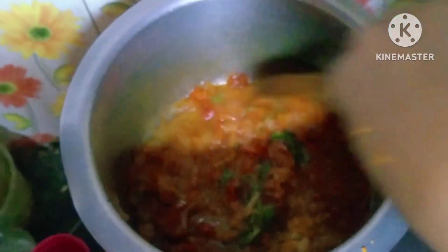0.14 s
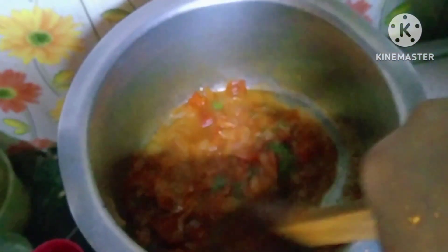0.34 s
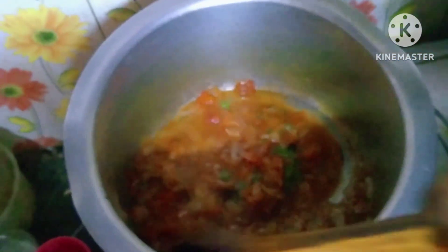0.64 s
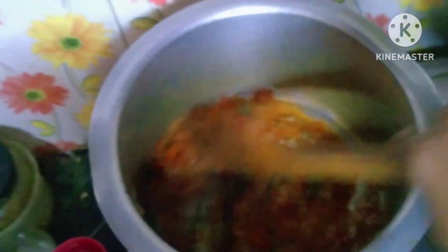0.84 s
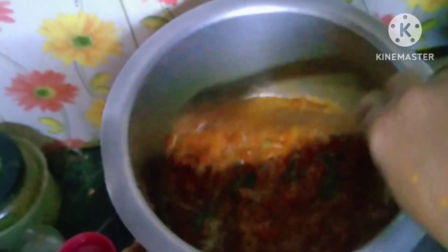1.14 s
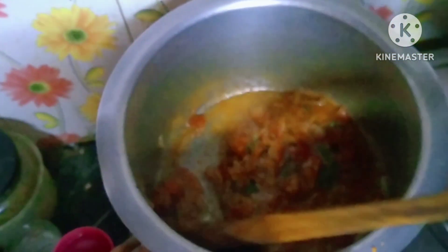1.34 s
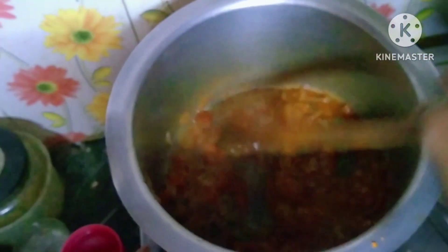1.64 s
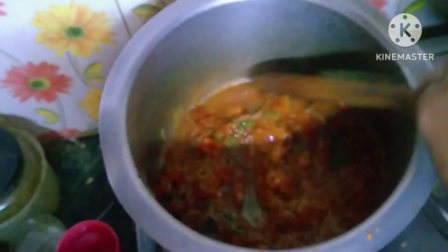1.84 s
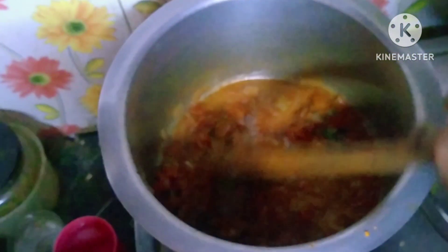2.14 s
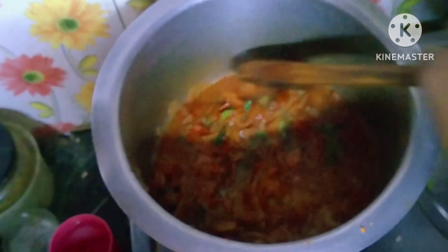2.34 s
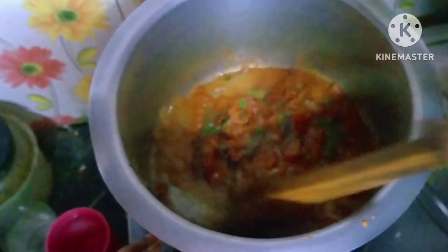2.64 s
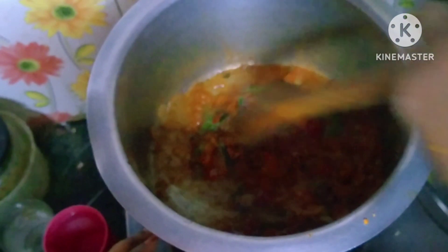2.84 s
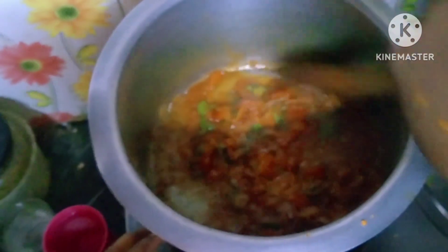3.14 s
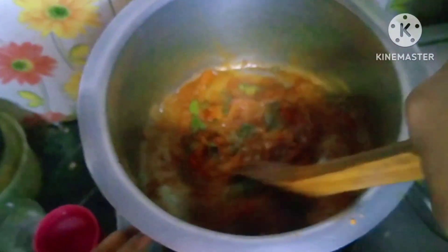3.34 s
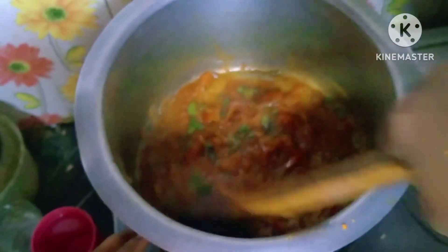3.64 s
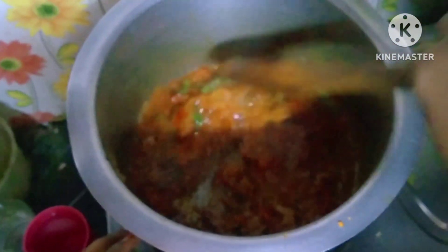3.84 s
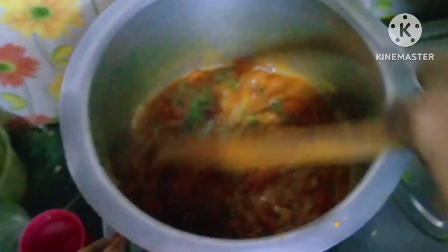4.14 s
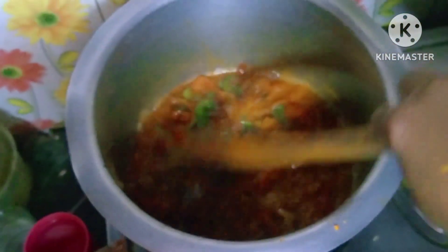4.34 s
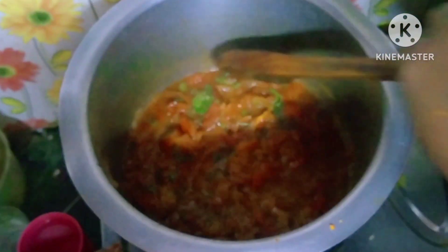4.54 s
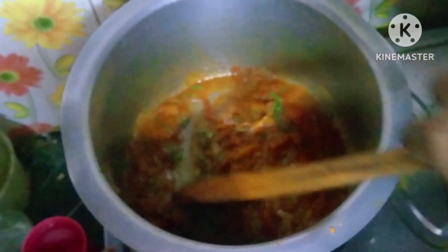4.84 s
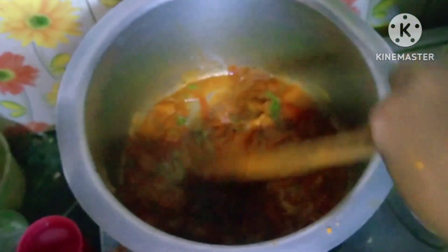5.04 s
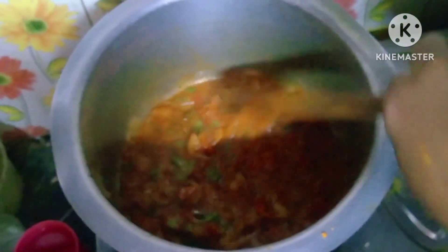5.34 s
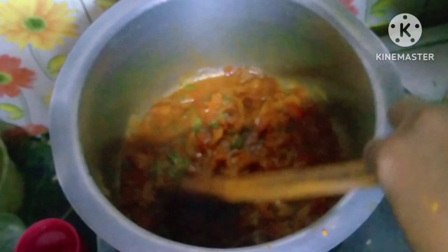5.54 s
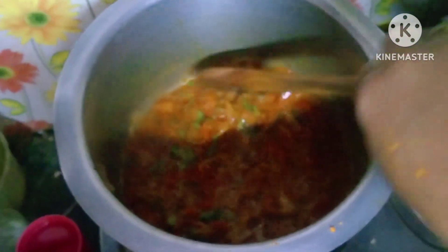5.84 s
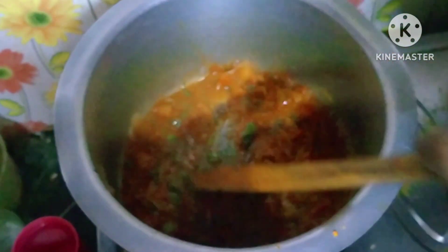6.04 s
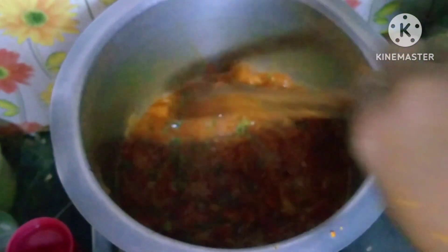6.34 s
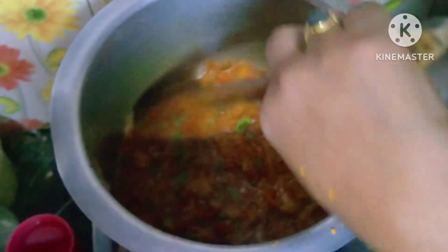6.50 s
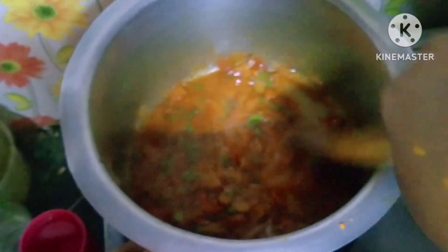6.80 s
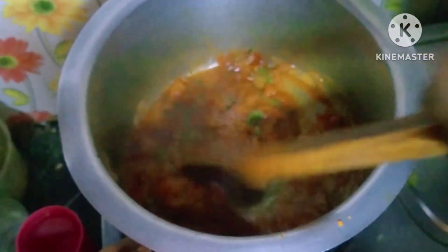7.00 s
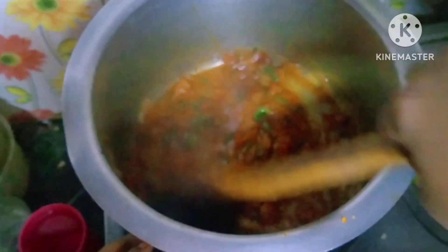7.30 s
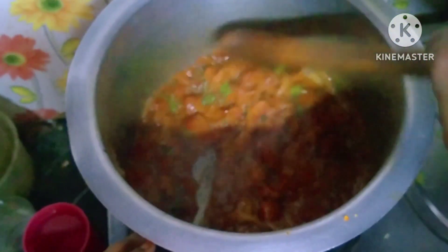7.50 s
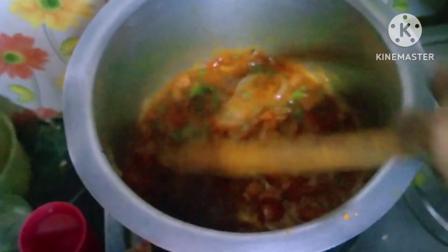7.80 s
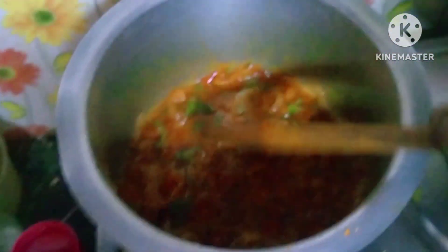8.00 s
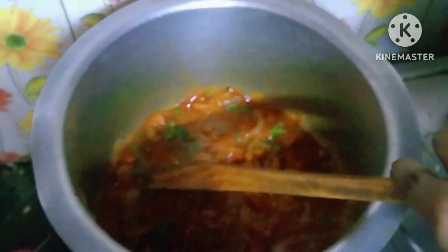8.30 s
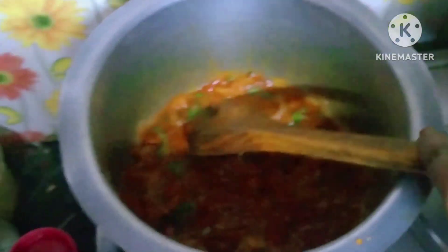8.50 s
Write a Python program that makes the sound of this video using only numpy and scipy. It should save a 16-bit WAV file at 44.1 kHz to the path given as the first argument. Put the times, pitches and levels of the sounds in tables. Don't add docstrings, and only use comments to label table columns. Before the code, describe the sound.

Close by in a small tiled kitchen, thick sauce fries throughout with a fine, uneven crackling hiss and little spits of steam. At 0.1 s a wooden spoon strikes the thin metal pot: a bright woody clack with a clear, short ring. Quick wet scrapes follow, with a dull thud and smack at 0.8 s and another ringing clank at 1.15 s. The pot rattles on its iron grate near 2 s; a firm clank comes at 2.55 s, with a lighter touch just after. Softer knocks fall at 3.2 and 3.7 s. From 4.4 to 6 s it is mostly stirring, grate rattle, low thumps and stove shudder, with small spits. At 7.35 s comes a hard clank with a strong wet smack, thud and rattle, then a lesser ringing knock at 7.7 s. The scraping settles and the sizzle continues slightly softer to about 8.7 s.

```python
import sys
import numpy as np
from scipy import signal
from scipy.fft import rfft, irfft, next_fast_len
from scipy.io import wavfile

SR = 44100
rng = np.random.default_rng(int(sys.argv[2]) if len(sys.argv) > 2 else 0)


def unload_wav(signal):
    wavfile.write(
        sys.argv[1],
        SR,
        np.round(np.clip(np.atleast_2d(signal).T, -1, 1) * 32767).astype(np.int16),
    )


def natural_amplitude(level_db):
    exponent = np.asarray(level_db, float) / 20
    return 10 ** exponent


N = 381906


def unit(x):
    return x / np.sqrt(np.mean(x ** 2))


def noise():
    return rng.standard_normal(N)


def decay(t, t60):
    return np.exp(-np.log(1000) * t / t60)


def colour(x, spectrum):
    hz, db = np.transpose(spectrum)
    size = next_fast_len(N)
    log_hz = np.log(np.arange(size // 2 + 1) * SR / size + 1)
    gain = natural_amplitude(np.interp(log_hz, np.log(hz), db))
    return unit(irfft(rfft(x, size) * gain, size)[:N])


def split(x, hz):
    parts = []
    for kind in ("low", "high"):
        sos = signal.butter(4, hz, kind, fs=SR, output="sos")
        parts.append(unit(signal.sosfilt(sos, x)))
    return parts


def ring(x, hz, t60):
    r, w = decay(1 / SR, t60), 2 * np.pi * hz / SR
    return signal.lfilter([0, r * np.sin(w)], [1, -2 * r * np.cos(w), r * r], x)


def swell(x, hz, t60, rise_s):
    return 2 / (rise_s * SR) * ring(ring(x, hz, t60), hz, rise_s * np.log(1000))


def resonate(x, peaks):
    return unit(sum(natural_amplitude(db) * unit(ring(x, hz, np.log(1000) / (np.pi * width))) for hz, width, db in peaks))


def grains(share, spread_db):
    clicks = (rng.random(N) < share) * noise()
    return unit(clicks * natural_amplitude(spread_db * np.minimum(rng.exponential(size=N), 4)))


def fizz(rate, t60, spread_db):
    starts = rng.random(N) < rate / SR
    bubbles = starts * natural_amplitude(spread_db * np.minimum(rng.exponential(size=N), 3))
    return unit(signal.lfilter([1], [1, -decay(1 / SR, t60)], bubbles))


def puffs(times, dbs, t60s, rise_s):
    out, t = np.zeros(N), np.arange(SR // 2) / SR
    for s, db, t60 in zip(times, dbs, t60s):
        i = int(s * SR)
        shape = (1 - np.exp(-t / rise_s)) * decay(t, max(t60, .005))
        out[i:i + len(t)] += natural_amplitude(db) * shape[:N - i]
    return out


def surges(times, dbs, rises, t60s):
    t = np.arange(0, N, 64) / SR
    power = 0
    for s, db, rise, t60 in zip(times, dbs, rises, t60s):
        slope_db = np.where(t < s, 20 * (t - s) / max(rise, .005), -60 * (t - s) / t60)
        power = power + natural_amplitude(db + slope_db) ** 2
    return np.interp(np.arange(N) / SR, t, np.sqrt(power))


def blows(times, dbs, skid, skid_s):
    hits = np.zeros(N)
    hits[(np.asarray(times) * SR).astype(int)] = natural_amplitude(dbs)
    t = np.arange(2048) / SR
    tail = rng.standard_normal(2048) * np.exp(-t / skid_s)
    tail = skid * tail / np.sqrt(np.sum(tail ** 2))
    tail[0] += 1
    return signal.fftconvolve(hits, tail)[:N]


# time in seconds, level in dB.
FRYING_HEAT = [(0.0, -51), (0.29, -48.5), (1.23, -49.5), (1.54, -51), (2.87, -49), (3.13, -50.5),
               (3.81, -49.5), (4.12, -52.5), (4.56, -50.5), (5.35, -52.5), (5.69, -49.5), (6.1, -52),
               (6.39, -53), (6.9, -49), (7.28, -50), (8.05, -52), (8.25, -52.5), (8.66, -51.5)]
# frequency in Hz, density in dB per Hz.
FRY_SPECTRUM = [(1500, -12.5), (2400, -0.5), (2900, 1.5), (3300, -9), (4100, -9.5), (4900, -7.5),
                (6000, -5), (7000, -3), (8100, -4), (8900, -13), (9800, -14.5), (11500, -9), (14500, -8),
                (15800, -10.5)]


def frying(patch):
    t = np.arange(N) / SR
    s, db = np.transpose(FRYING_HEAT)
    heat_db = np.interp(t, s, db)
    fry_db = heat_db + 2.5
    settled_db = -3 * np.clip((t - 8.1) / .15, 0, 1)
    spray_db = -58 + 0.57 * (heat_db - heat_db.mean()) + settled_db + 0.64
    coarse, spray = split(colour(grains(0.1, 6.4) + 7.0 * noise(), FRY_SPECTRUM), 8520)
    low, high = split(coarse, 6080)
    shared = fizz(rate=83, t60=0.05, spread_db=11.0)
    low = low * (0.47 + 0.24 * shared + 0.11 * fizz(rate=32, t60=0.037, spread_db=-7.0))
    high = high * (0.57 + 0.091 * shared + 0.42 * fizz(rate=70, t60=0.055, spread_db=-1.5))
    spray = spray * (0.9 + 0.079 * shared + 0.4 * fizz(rate=45, t60=0.029, spread_db=6.0))
    flare = patch()
    fry = low * natural_amplitude(-5.0) + high * flare * natural_amplitude(-4.0)
    return fry * natural_amplitude(fry_db) + spray * flare * natural_amplitude(spray_db)


def fat_patches():
    return 0.85 + 0.25 * fizz(rate=7, t60=0.42, spread_db=2.0)


# fastest moment in seconds, level in dB, half length in seconds.
STROKES = [(0.248, -49, 0.14), (0.5, -44.5, 0.042), (1.198, -53.5, 0.24), (1.695, -50.5, 0.05),
           (2.057, -47.5, 0.059), (2.165, -49.5, 0.099), (2.7, -54, 0.12), (3.34, -50, 0.1),
           (3.89, -50.5, 0.087), (4.246, -50.5, 0.047), (4.91, -52, 0.099), (5.77, -51, 0.065),
           (.49, -52, 0.063), (5.562, -58, 0.33), (6.12, -49.5, 0.061), (7, -50, 0.096), (7.403, -57, 0.13),
           (7.818, -50, 0.13)]


def sweeps():
    t = np.arange(N) / SR
    power = natural_amplitude(-55) ** 2
    for s, db, half_s in STROKES:
        power = power + natural_amplitude(db) ** 2 * np.exp(-((t - s) / half_s) ** 2)
    return np.sqrt(power)


# frequency in Hz, density in dB per Hz.
DRAG_SPECTRUM = [(88, -11), (150, -19), (231, 2.5), (269, -12), (505, -4.5), (845, -3.5), (932, -5.5),
                 (1070, -2.5), (1250, -5.5), (2010, -5), (2180, -7), (2880, -13), (4200, -19), (5460, -80),
                 (9240, -120)]


def drag():
    wet = grains(.02, 1.0) + 2.17 * noise()
    wall = [(hz, 40, db) for hz, db, _ in UPPER_RINGS[:3]]
    wall += [(524.0, 190, 9.0), (1174, 6.5, 6.1), (1520, 6, 6.5), (2890, 64, 14.4)]
    rough = 0.7 + 0.18 * fizz(rate=26, t60=0.064, spread_db=-2.0)
    rub = (colour(wet, DRAG_SPECTRUM) + 0.33 * resonate(wet, wall)) * rough
    hum = natural_amplitude(-11.5) * resonate(wet, [(549, 9, 0)])
    return (rub + hum) * sweeps()


# start in seconds, level in dB, pitch in Hz.
THUDS = [(0.092, -36.5, 278), (0.776, -31.5, 253), (0.812, -33, 233), (0.976, -38.5, 256),
         (1.148, -47, 228), (1.678, -42, 254), (1.972, -32.5, 245), (2.021, -32, 136), (2.278, -45, 249),
         (2.377, -43, 141.9), (2.558, -38.5, 245), (2.688, -54, 148.4), (3.705, -33.5, 252),
         (4.43, -34.5, 238.5), (4.52, -34.5, 137.6), (5.156, -32.5, 152), (5.674, -41, 153),
         (5.705, -41, 240), (6.032, -49, 243), (6.317, -52, 231), (7.003, -44.5, 247), (7.34, -29, 247),
         (7.42, -51, 137), (7.486, -47, 131), (7.719, -48, 237), (7.803, -41, 152)]
# peak in seconds, level in dB, build-up in seconds, t60 in seconds.
SHOVES = [(.12, -47.5, 0.1, 0.82), (.8, -50.5, 0.055, 2.7), (1.05, -53, .1, 2.2), (3.4, -39, 0.12, 0.54),
          (3.83, -50, 0.18, 2.4), (4.25, -48.5, 0.062, 2), (4.46, -42.5, 0.082, 1.15),
          (5.159, -37.5, 0.018, 0.81), (5.42, -32, 0.084, 1.2), (5.62, -50, .1, .7), (6.42, -44.5, 1, 0.33)]
SWAY_SHARE_DB = [-5, -8, -9, -7, -4, -6, -1, 2, -11.5, -12, -4.5]


def stove():
    out, t = np.zeros(N), np.arange(SR // 2) / SR
    for s, db, hz in THUDS:
        i = int(s * SR)
        thud = natural_amplitude(db) * np.sin(2 * np.pi * hz * t) * (1 - np.exp(-t / 0.0014)) * decay(t, 0.13)
        out[i:i + len(t)] += thud[:N - i]
    s, db, rise_s, t60 = np.transpose(SHOVES)
    sway_lag_s, sway_slower = 0.076, 2.04
    shudder = np.hypot(natural_amplitude(-62.5), surges(s, db, rise_s, t60))
    tips = surges(s + sway_lag_s, db + SWAY_SHARE_DB, sway_slower * rise_s, sway_slower * t60)
    sway = np.hypot(natural_amplitude(-57), tips)
    s, db, _ = np.transpose(THUDS)
    drone = np.hypot(natural_amplitude(-64.5), surges(s + 0.036, db - 16.5, 0 * s + 0.062, 0 * s + 1.46))
    for gain, hz, width_hz in [(shudder, 76.5, 13.6), (sway, 27.6, 10.4), (drone, 132.2, 35.0)]:
        sheet = resonate(noise(), [(hz, width_hz, 0)])
        out += gain * resonate(sheet, [(hz, 2.2 * width_hz, 0)])
    return out


# start in seconds, level in dB, share above 6.9 kHz in dB, t60 in seconds.
SPLASHES = [(0.0925, -6, -26, 0.033), (0.4415, -20.5, -5, 0.034), (0.45, -29.5, -6.5, 0.27),
            (1.1492, -18.5, -15, 0.025), (2.014, -25, -19, 0.056), (2.5627, -18.5, -13, 0.028),
            (2.6852, -19.5, -19, 0.078), (3.19, -33, -4.5, 0.05), (3.3957, -34.5, -11, 0.23),
            (4.4025, -33, -8.5, 0.032), (5.636, -22, -10, 0.025), (7.0146, -38.5, -2.5, 0.21),
            (7.0554, -29, -12, 0.041), (7.4754, -42, 4, 0.042), (7.718, -28, -13.5, 0.086)]
# start in seconds, level in dB.
SPITS = [(0.2425, -29), (0.853, -35), (0.9762, -36), (1.0585, -39), (1.287, -32), (1.639, -33),
         (1.791, -31.5), (1.9939, -36), (2.3825, -35), (3.3777, -32), (3.707, -26.5), (3.8767, -33),
         (4.039, -26), (4.1275, -33), (4.6724, -34), (5.0514, -36), (5.5653, -34), (6.325, -34), (6.1, -34),
         (6.37, -34), (6.666, -35), (6.7136, -34), (6.9701, -30.5), (7.3405, -30), (8.0671, -43),
         (8.1264, -36.5)]


def splashes():
    s, db, top_db, t60 = np.transpose(SPLASHES + [(s, db, -18, 0.05) for s, db in SPITS])
    hiss = split(colour(noise(), FRY_SPECTRUM), 4270)[1]
    body, top = split(hiss, 6900)
    body = body * puffs(s, db - 9.5, t60, rise_s=0.0011)
    return body + top * puffs(s, db + top_db - 0.5, t60, rise_s=0.0013)


# start in seconds, level in dB, pitch in Hz, t60 in
# seconds.
SMACKS = [(1.969, -37.5, 3300, 0.022), (2.188, -40, 1140, 0.034), (2.793, -35.5, 3800, 0.032),
          (4.172, -46, 850, 0.17), (4.251, -43, 1750, 0.27), (4.274, -45.5, 2290, 0.11),
          (6.6, -42, 1950, 0.04), (6.12, -43, 2050, .05), (4.93, -45, 2200, .1), (6.164, -39, 6000, 0.032),
          (7.036, -37, 1110, 0.04), (7.3405, -15.5, 980, 0.042), (7.049, -39, 2700, 0.075),
          (8.652, -39, 610, 0.043), (0.7765, -27, 960, 0.035), (.977, -36, 1150, 0.03),
          (0.977, -36, 1900, 0.04), (0.978, -38, 2700, .05), (4.418, -40, 520, 0.05),
          (4.039, -41, 2320, .04), (3.979, -43, 1900, .03), (4.19, -44, 2720, .03), (4.156, -45, 2300, .03),
          (.455, -44, 2300, .2), (7.165, -44, 2600, .03), (7.186, -44, 2750, .03),
          (0.099, -30, 1400, 0.063), (4.472, -33, 1330, .04), (2.688, -45, 3200, .07),
          (1.149, -32, 2600, 0.06), (1.15, -30, 720, 0.046), (1.9, -46.5, 2300, 0.14),
          (2.56, -26.5, 810, 0.045), (2.561, -33, 1920, 0.055), (6.883, -38, 2600, .03),
          (7.345, -20, 1580, 0.1), (7.372, -24.5, 1170, .09), (7.72, -33, 2130, 0.1),
          (7.341, -42, 1900, .06), (1.697, -39, 1380, .05), (2.28, -35.5, 1200, .05)]


def smacks():
    out, wet = np.zeros(N), noise()
    for s, db, hz, t60 in SMACKS:
        now = slice(int(s * SR), int((s + .3) * SR))
        envelope = puffs([s], [db], [t60], rise_s=0.00089)[now]
        out[now] += envelope * resonate(wet[now], [(hz, 0.095 * hz, 0)])
    return out


# start in seconds, upper rings in dB, dull clack in dB,
# bright clack in dB, clack t60 in seconds.
CRACKS = [(0.093, -20, -24.5, -13, 0.055), (0.1284, -26, -22, -48, 0.016), (0.413, -41, -61, -34, 0.064),
          (0.7786, -69, -35, -62, 0.077), (0.815, -53, -35, -56, 0.11), (0.9757, -46, -36.5, -29.5, 0.1),
          (1.1495, -27, -25, -12.5, 0.044), (2.561, -22, -29.5, -19, 0.048),
          (2.6903, -38, -41.5, -36, 0.11), (3.1883, -37, -30.5, -27, 0.055), (3.585, -44, -63, -45, 0.059),
          (3.702, -30.5, -47, -66, 0.4), (3.727, -58, -37.5, -50, 0.067), (7.3403, -31, -21, -27, 0.043),
          (7.352, -48, -33, -35, 0.035), (7.37, -54, -40, -34, 0.053), (7.7187, -29, -30, -24, 0.08),
          (8.2137, -50, -75, -37, 0.059)]
# frequency in Hz, density in dB per Hz.
CLACK_SPECTRUM = [(120, -48), (330, -15), (480, -3), (700, -2), (1000, -2), (1400, -8.5), (2000, -7),
                  (2900, -1.5), (4500, -9), (6500, -7), (9500, -33)]


def clacks():
    s, _, dull_db, bright_db, t60 = np.transpose(CRACKS)
    dull, bright = split(colour(noise(), CLACK_SPECTRUM), 1690)
    dull = dull * puffs(s, dull_db + 3, 0.56 * t60, rise_s=0.0003)
    return dull + bright * puffs(s, bright_db - 8.0, t60, rise_s=0.0006)


# start in seconds, then rim, wall, wall twin, rim twin in dB.
KNOCKS = [(0.093, -20.5, -19.5, -28, -36), (.343, -56, -40.5, -63.5, -62), (0.7762, -35.5, -61, -36, -46),
          (1.149, -25, -22, -45, -27), (2.561, -21, -41, -26.5, -28), (2.6861, -36, -51, -32.5, -60),
          (3.188, -48, -32.5, -38, -33.5), (3.729, -41, -68, -47, -64), (6.868, -54, -51, -62, -62),
          (7.004, -60, -50, -62, -64), (7.053, -49, -61, -56, -62), (7.34, -14, -27, -22, -50),
          (7.716, -28, -24, -47, -30)]
# start in seconds, t60 in seconds, floor in dB.
CHOKES = [(1.16, 1.6, -14), (2.7, 2, -1.5), (2.84, 0.25, -30), (3.846, 0.13, -60), (7.39, .15, -2.5),
          (.13, 0.54, -2), (0.86, 0.2, -15), (1.29, 0.27, -13), (6.92, .1, -30), (7.03, .1, -30),
          (7.1, .2, -30), (.42, .2, -20), (7.88, 1, -10), (0.295, .3, -6)]


def choke():
    gain, t = np.ones(N), np.arange(N) / SR
    for s, t60, floor_db in CHOKES:
        next_knock_s = min((k[0] for k in KNOCKS if k[0] > s), default=N / SR)
        held = (t >= s) & (t < next_knock_s - .002)
        gain[held] *= np.maximum(natural_amplitude(-60 * (t[held] - s) / t60), natural_amplitude(floor_db))
    return gain


# frequency in Hz, level in dB, t60 in seconds.
KNOCK_RINGS = [
    [(1471, 0, .52), (1503, -22, .3)],
    [(1102, 0, .52)],
    [(1138, 0, .32)],
    [(1601, 0, .42), (2478, -9, .15), (3070, -11, .14), (1657, -11, .35), (1830, -10, .17)],
]
# start in seconds, then oval, pressed rim, pressed twin, shoulder in dB.
FLEXES = [
    (0.093, -21.5, -24.5, -25.5, -29),
    (0.777, -33.5, -51, -41, -29.5),
    (1.15, -23.5, -50, -46, -21),
    (2.5599, -26.5, -54.5, -54, -31),
    (2.686, -36, -58, -58, -52),
    (3.188, -43.5, -42, -37, -30),
    (3.728, -43, -64, -64, -60),
    (7.3395, -59, -40, -42, -16.5),
    (7.363, -21, -60, -60, -40),
    (7.717, -26, -55, -32, -53),
]
# frequency in Hz, level in dB, t60 in seconds.
FLEX_RINGS = [
    [(477, 0, .19), (487, -15, .32), (552, -21, .3)],
    [(1496, 0, .33)],
    [(1584, 0, .35)],
    [(1176, 0, .13), (1227, -7, .1)],
]
# start in seconds, then low, middle, top of the close trio, band below in dB.
GLINTS = [(0.094, -23, -19, -16.5, -31.5), (.106, -31, -30, -29, -35), (0.412, -55, -38, -39, -60),
          (1.1513, -33, -19, -27, -30), (2.5613, -43, -27.5, -38, -50), (2.578, -47, -29, -26, -60),
          (2.6903, -55, -52, -37, -60), (3.585, -60, -43, -52, -62), (7.3405, -38, -33, -35, -41),
          (7.368, -50, -58, -43, -55), (7.7179, -53, -28, -41, -34), (7.742, -55, -38, -32, -46)]
# frequency in Hz, level in dB, t60 in seconds.
GLINT_RINGS = [
    [(2842, 0, .17), (2859, -4, .2)],
    [(2878, 0, .14)],
    [(2912, 0, .15)],
    [(2105, 0, .23)],
]
# start in seconds, then low, paired, middle, high rings in dB.
FLANKS = [
    (0.0925, -45, -42, -42, -38),
    (1.1505, -29, -26, -35, -31),
    (2.5615, -40, -42, -30, -36),
    (3.1885, -56, -37, -40, -46),
    (7.3405, -40, -31, -45, -48),
    (7.378, -36, -42, -45, -50),
    (7.7185, -40, -34, -47, -35),
]
# frequency in Hz, level in dB, t60 in seconds.
FLANK_RINGS = [
    [(1830, 0, .11)],
    [(2282, 0, .12), (2336, -2, .12)],
    [(2472, 0, .15)],
    [(4000, 0, .09), (4110, -2, .08)],
]
# frequency in Hz, level in dB, t60 in seconds.
UPPER_RINGS = [(2288, -10, .13), (2582, -13, .22), (3005, -11, .15), (3337, -9, .17), (3435, -19, .18),
               (3720, -20, .18), (4000, -15, .16), (4110, -15, .15), (5260, -20, .11)]


def rings():
    out = 0
    groups = [(KNOCKS, KNOCK_RINGS), (FLEXES, FLEX_RINGS), (GLINTS, GLINT_RINGS), (FLANKS, FLANK_RINGS)]
    for events, families in groups:
        s, *levels = np.transpose(events)
        for dbs, modes in zip(levels, families):
            push = blows(s, dbs, skid=0.011, skid_s=0.0093)
            for hz, db, t60 in modes:
                out = out + natural_amplitude(db) * swell(push, hz, t60, rise_s=4.9 / min(hz, 1500))
    s, upper_db, *_ = np.transpose(CRACKS)
    push = blows(s, upper_db - 9.5, skid=0.05, skid_s=0.019)
    for hz, db, t60 in UPPER_RINGS:
        out = out + natural_amplitude(db) * swell(push, hz, t60, rise_s=0.0039)
    return out * choke()


# start in seconds, level in dB, prong in dB.
ROCKS = [(0.2654, -44.5, -2), (0.318, -45, 1), (0.84, -41, -5), (0.901, -42, -7), (1.018, -38, -20),
         (1.053, -42, -15), (1.283, -38.5, -17), (1.701, -45, -13), (2.017, -33.5, -3), (2.063, -37, -1),
         (2.2444, -46, -5), (2.276, -40, -11), (2.384, -39, -4), (2.43, -44.5, -15), (3.364, -44, -22),
         (3.7684, -46, -15), (3.824, -46, -6), (4.1574, -49.5, -7), (4.414, -44, -21), (4.467, -36, -7),
         (4.519, -37.5, -1), (4.571, -37, 0), (4.623, -40, -3), (4.671, -41.5, -6), (4.792, -46.5, -15),
         (4.8474, -52, -8), (4.8848, -46.5, -8), (4.9355, -48.5, -16), (4.989, -47, -17),
         (5.181, -39.5, -13), (5.4954, -48.5, -17), (5.709, -39, -11), (5.7656, -40.5, -8),
         (5.8147, -43, -10), (6.0289, -45, -26), (6.097, -52, -18), (6.1264, -45, -15), (6.96, -45.5, -18),
         (7.379, -34.5, -12), (7.417, -41, 1), (7.474, -36, 0.5), (7.5644, -49, -19), (7.6084, -52, -13),
         (7.66, -46, -5.5), (7.8096, -40.5, -22)]
# frequency in Hz, width in Hz, level in dB.
GRATE_LOW = [(597, 6.9, 8), (1310, 500, 9.5), (1860, 100, -40), (2275, 250, 12.5), (2530, 140, -28)]
# frequency in Hz, width in Hz, level in dB.
GRATE_HIGH = [(3900, 90, -11), (5740, 90, -2), (6050, 200, -6), (7100, 160, 0), (7990, 150, -7)]
# frequency in Hz, level in dB, t60 in seconds.
BARS = [(549, -6, .1), (1240, -3, .05), (1360, -1, .06), (1820, -7, .05), (2190, -1, .045),
        (2320, -1, .055), (5700, -13, .07), (7110, -15, .05)]
# frequency in Hz, level in dB, t60 in seconds.
PRONG = [(4540, -4, .016), (4630, 0, .022), (4730, -2, .016), (6020, -4, .025)]


def grate():
    s, db, prong_db = np.transpose(ROCKS)
    db = db + 12
    t60 = np.full(len(s), 0.12)
    low = resonate(noise(), GRATE_LOW) + 0.7 * colour(grains(0.37, 4.1), DRAG_SPECTRUM)
    high = resonate(noise(), GRATE_HIGH) + 0.13 * colour(noise(), FRY_SPECTRUM)
    out = low * puffs(s, db - 10.5, t60, rise_s=0.0065)
    out = out + high * puffs(s, db - 8.5, 0.38 * t60, rise_s=0.0052)
    for modes, dbs in [(BARS, db - 31), (PRONG, db + prong_db - 24)]:
        scuff = puffs(s, dbs, 0 * s + .04, rise_s=0.0029) * np.sign(noise())
        for hz, mode_db, ring_s in modes:
            out = out + natural_amplitude(mode_db) * swell(scuff, hz, ring_s, rise_s=.001)
    return out


def room(near):
    t = np.arange(SR // 2) / SR
    walls = rng.standard_normal(len(t)) * decay(t, 0.19) * (t > .004)
    walls = walls / np.sqrt(np.sum(walls ** 2))
    return natural_amplitude(-5) * signal.fftconvolve(near, walls)[:N]


def scene():
    near = clacks() + grate() + splashes() + smacks()
    return (near + room(near) + rings() + stove() + frying(fat_patches) + drag())[None]


def band_limit(x):
    return signal.sosfilt(signal.butter(12, 16280, fs=SR, output="sos"), x)


def record(dry):
    low_pass = signal.ellip(10, .2, 70, 15480, fs=SR, output="sos")
    mix = signal.sosfilt(low_pass, dry)
    return band_limit(mix)


dry = scene()
out = record(dry)
unload_wav(out)
```